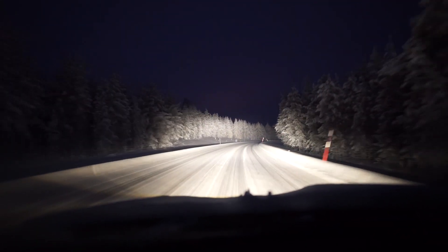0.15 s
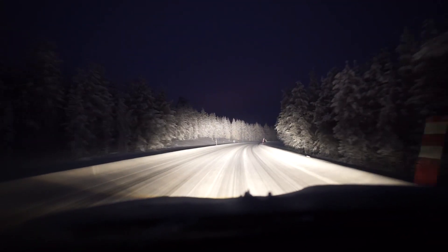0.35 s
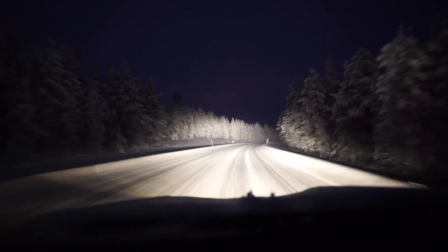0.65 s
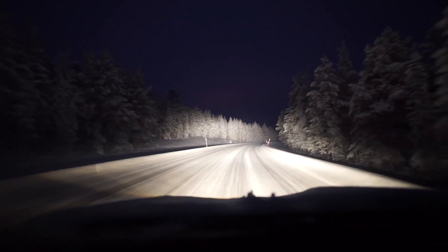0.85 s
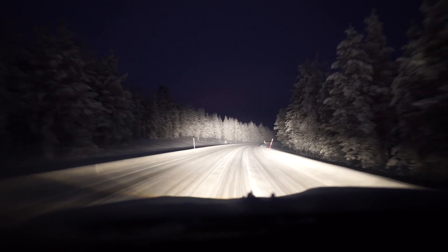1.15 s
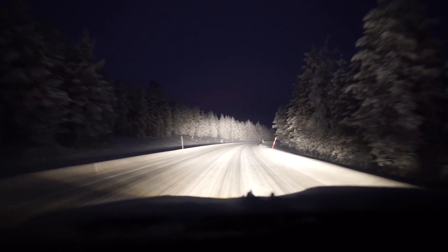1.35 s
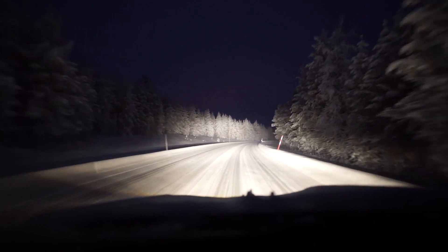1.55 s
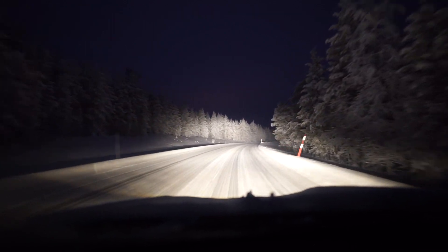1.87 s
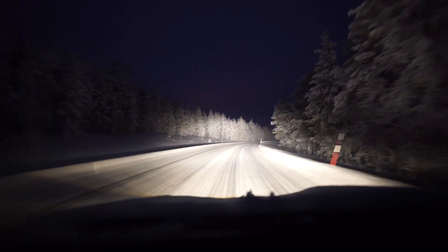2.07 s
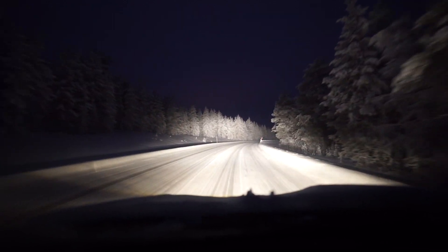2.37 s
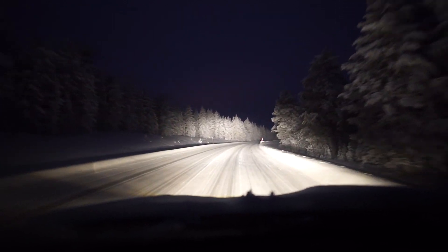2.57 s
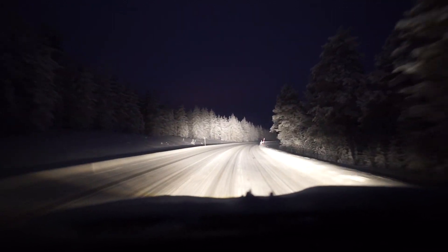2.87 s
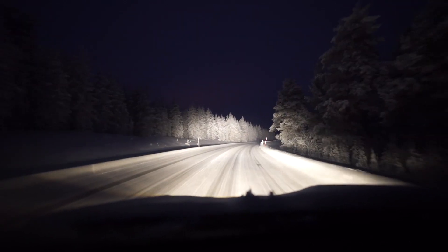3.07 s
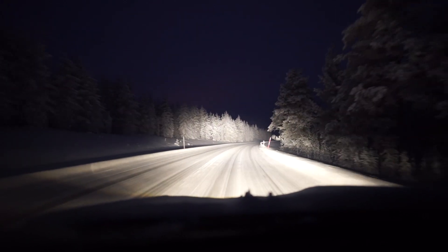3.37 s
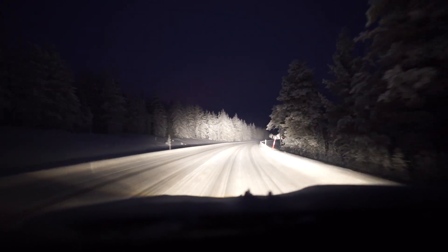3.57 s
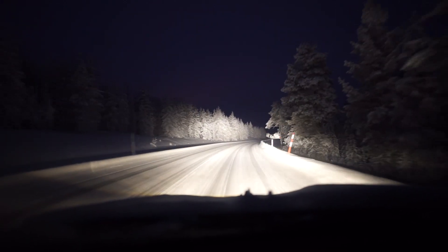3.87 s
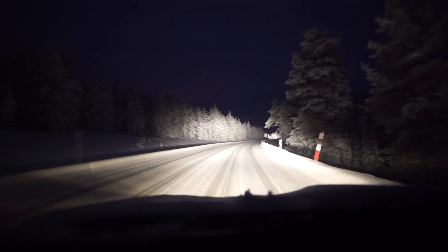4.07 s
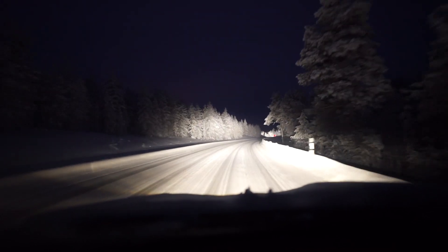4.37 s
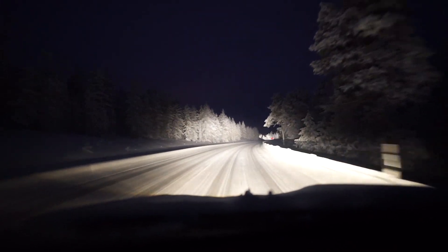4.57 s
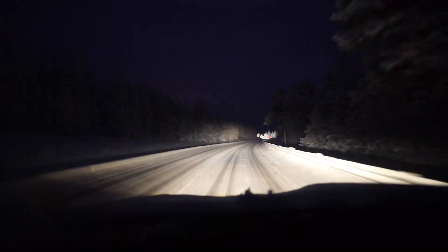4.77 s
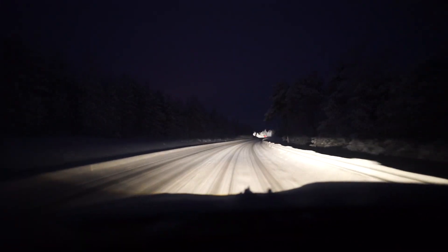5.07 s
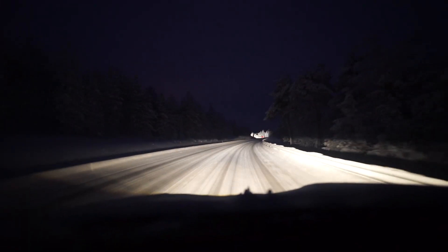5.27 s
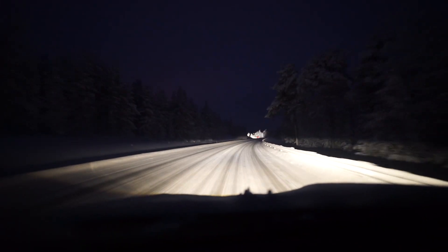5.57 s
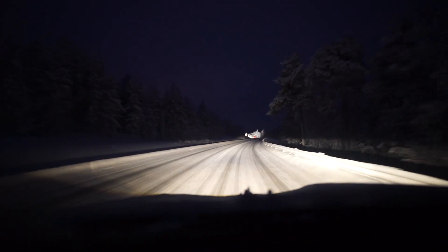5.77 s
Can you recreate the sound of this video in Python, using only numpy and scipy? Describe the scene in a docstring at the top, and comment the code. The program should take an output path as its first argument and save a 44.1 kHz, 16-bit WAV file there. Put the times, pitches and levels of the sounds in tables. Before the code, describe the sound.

Inside an electric car at night, tyres rumble steadily over packed snow, with low cabin boom, hollow crunches and dull thumps.

```python
"""Electric car on packed snow, from the cabin

A low boom rings the cabin's resonances, swelling and easing as the road heaves the body.
Random impacts ring the tyres into drumming and the floor panels into crunch, harder on rutted stretches.
Filtered noise and grit make a faint hiss; sine tones give the inverter whine and, with noise, the tread song.
Ridges thump, crust gives way in runs of hollow cracks, and short bursts of noise tick in the trim.
"""
import sys
import numpy as np
from scipy import signal
from scipy.fft import rfft, irfft, next_fast_len
from scipy.io import wavfile
from scipy.ndimage import uniform_filter1d, minimum_filter1d

SR = 44100
rng = np.random.default_rng(int(sys.argv[2]) if len(sys.argv) > 2 else 0)


def file_out(sig):
    """Save sig as 16-bit WAV at sys.argv[1]."""
    # one column per channel
    cols = np.atleast_2d(sig).T
    # limit, then scale
    lim = np.clip(cols, -1, 1)
    pcm = np.round(lim * 32767).astype(np.int16)
    wavfile.write(sys.argv[1], SR, pcm)


N = 261068
PADDED = next_fast_len(N, True)
T, HZ = np.arange(N) / SR, np.fft.rfftfreq(PADDED, 1 / SR)


def amp(db):
    """Decibels to gain."""
    return 10 ** (np.asarray(db) / 20)


def unit(x):
    """Scales a sound to rms 1."""
    return x / np.sqrt(np.mean(x ** 2) + 1e-20)


def read(points):
    """Reads a table over frequency, joined by straight lines on a log axis."""
    hz, value = np.transpose(points)
    return np.interp(np.log(HZ + 1), np.log(hz + 1), value)


def resonances(modes):
    """Gain over frequency of a few resonances; each width is roughly that at half amplitude."""
    power = 0
    for hz, width_hz, db in modes:
        offset = (HZ - hz) / (0.47 * width_hz)
        power = power + amp(db) ** 2 / (1 + offset ** 2) ** 2
    return np.sqrt(power)


def below(x, hz):
    """The part of a sound under a frequency."""
    size = next_fast_len(N + SR // 10, True)
    lowpass = 1 / (1 + (np.fft.rfftfreq(size, 1 / SR) / hz) ** 6)
    return irfft(rfft(x, size) * lowpass, size)[..., :N]


def wander(rate_hz, size=32768):
    """A slow random curve of about rms 1, moving no faster than about rate_hz."""
    hz = np.fft.rfftfreq(size, N / SR / size)
    slow = irfft(rfft(rng.standard_normal(size)) / (1 + (hz / rate_hz) ** 6))
    return unit(np.interp(T, np.linspace(0, N / SR, size), slow))


def swell(centre_s, half_s):
    """A smooth rise and fall around one moment, down to 1/e at half_s either side."""
    out = np.zeros(N)
    near = slice(*np.searchsorted(T, [centre_s - 4 * half_s, centre_s + 4 * half_s]))
    out[near] = np.exp(-((T[near] - centre_s) / half_s) ** 2)
    return out


def panned(pan_db):
    """Left and right gains, for a left-minus-right difference in dB."""
    return amp([[pan_db / 2], [-pan_db / 2]])


def grains(per_s, spread_db):
    """Two unrelated trains of tiny impacts at random moments, a few of them large."""
    size = amp(spread_db * np.minimum(rng.exponential(1, (2, N)), 4))
    sign = rng.choice([-1, 1], (2, N))
    struck = rng.random((2, N)) < per_s / SR
    return unit(size * sign * struck)


def patchy(x, depth_db, size=14, order=4, count=512):
    """Random swells over time and pitch, so that the strongest pitch keeps shifting."""
    # size: frames of count / 4 samples to smooth over; order: frequency bins to smooth over
    frames = dict(nperseg=count, noverlap=count - count // 4)
    z = signal.stft(x, **frames)[2]
    field = uniform_filter1d(rng.standard_normal(z.shape[1:]), order, 0)
    field = unit(uniform_filter1d(field, size, 1))
    return signal.istft(z * amp(depth_db * field), **frames)[1][:, :N]


def steady(x, size):
    """Evens out swells longer than size samples, so that the layer's level curve sets the loudness."""
    power = uniform_filter1d(uniform_filter1d(x.mean(0) ** 2, size), size)
    return x / np.sqrt(np.abs(power) + 1e-9)


# likeness of the two microphone ports: pitch_hz, likeness (0-1)
PORT_LIKENESS = [(50, .99), (110, .94), (195, .91), (260, .68), (350, .8), (450, .45), (620, .6),
                 (1100, .48), (1550, .55), (2000, .08), (4300, .03), (6200, .3), (14000, .25)]
# balance of the ports: pitch_hz, left_minus_right_db
PORT_BALANCE = [(25, -4), (50, -8), (125, -8.5), (170, -9), (215, 4.5), (250, -6), (370, 6.5), (480, -1),
                (620, 2), (800, 0.5), (1350, -0.5), (2200, 0.3), (15000, -0.5)]
# phase between the ports: pitch_hz, left_lead_rad
PORT_LEAD = [(40, 0.9), (90, -0.71), (125, -0.065), (175, -0.31), (220, -0.17), (275, 0.9), (345, -1.39),
             (420, 1), (550, -0.18), (1500, -0.16)]


def inside(drive, colour, ripple_db=2.5, ripple_s=0.02):
    """Colours two unrelated forces and mixes them as the cabin carries them to the two ports."""
    right, other = rfft(drive, PADDED) * colour
    same = np.clip(read(PORT_LIKENESS), 0, 1)
    left = (same * right + np.sqrt(1 - same ** 2) * other) * np.exp(1j * read(PORT_LEAD))
    lean = amp(read(PORT_BALANCE) / 2)
    # reflections from the glass comb the treble, differently at each port
    echoes = rng.standard_normal((2, N)) * np.exp(-T / ripple_s)
    comb = unit(rfft(echoes, PADDED).real) * np.clip(HZ / 1000 - .5, 0, 1)
    pair = irfft(np.array([left * lean, right / lean]) * amp(ripple_db * comb), PADDED)[:, :N]
    return pair / np.std(pair.mean(0))


# how crusty the road is: time_s, level_db (before the crunch's own gain)
CRUST_LEVELS = [(0, -41.5), (0.25, -43), (0.42, -44.5), (0.72, -49), (1.35, -44.5), (1.62, -43.5),
                (1.9, -43.5), (2.1, -45), (2.3, -44.5), (2.55, -44.5), (2.75, -45.5), (3.7, -46),
                (4.5, -47), (5.2, -45.5), (5.5, -44), (5.8, -48), (5.92, -41)]
USUAL_CRUST_DB = -45.5


def crustiness():
    """The snow under the tyres, in dB over the usual: long crusty stretches and softer ones."""
    return np.interp(T, *np.transpose(CRUST_LEVELS)) - USUAL_CRUST_DB


# rutted stretches: start_s, length_s, drumming_db, crunch_db (before each layer's gain)
RUTTED_STRETCHES = [(0.084, 0.1, -28, -60), (0.244, 0.029, -23.5, -56.5), (0.878, 0.032, -40.5, -37),
                    (1.082, 0.11, -25, -40.5), (1.297, 0.035, -26.5, -34.5), (1.397, 0.036, -25, -48),
                    (1.452, 0.12, -27, -53), (1.911, 0.025, -25, -31.5), (2.236, 0.019, -29.5, -52),
                    (2.312, 0.065, -23, -53), (2.5, 0.1, -23.5, -38), (2.635, 0.15, -32.5, -59.5),
                    (2.88, 0.045, -28.5, -52), (3.02, 0.048, -25, -56), (3.182, 0.03, -27, -35),
                    (3.463, 0.035, -26.5, -51), (3.559, 0.077, -26, -41.5), (3.735, 0.038, -17, -43),
                    (3.83, 0.057, -23, -51.5), (4.088, 0.2, -25, -53), (4.66, 0.072, -30.5, -60),
                    (4.884, 0.035, -28, -46), (5.402, 0.037, -26, -57), (5.493, 0.039, -22, -43),
                    (5.67, 0.061, -26.5, -38.5)]
RUT_EDGE_S = 0.024


def rutting():
    """Forces of drumming and crunch: each rutted stretch fades in, holds and fades out under the wheels."""
    drum, crush = np.zeros((2, N))
    for start_s, length_s, drum_db, crunch_db in RUTTED_STRETCHES:
        from_middle = np.abs(T - start_s - length_s / 2)
        outside = np.maximum(from_middle - length_s / 2 + RUT_EDGE_S / 2, 0)
        contact = np.exp(-(outside / RUT_EDGE_S) ** 2)
        drum += amp(drum_db) * contact
        crush += amp(crunch_db) * contact
    return drum, crush


# slick spots: centre_s, dip_db (each layer takes its own share), half_s
SLICK_SPOTS = [(0.3, -6.5, 0.1), (0.511, -2, 0.022), (0.825, -6, 0.031), (1.228, -7.5, 0.021),
               (1.608, -8.5, 0.017), (1.773, -2.5, 0.013), (2.13, -10, 0.01), (2.218, -3.5, 0.034),
               (2.445, -1, 0.0091), (2.825, -3, 0.015), (3.144, -4.5, 0.02), (3.26, -2.5, 0.039),
               (3.516, -3.5, 0.014), (4.642, -3.5, 0.023), (5.022, -3.5, 0.088), (5.209, -3, 0.053),
               (5.339, -5, 0.03)]


def slickness():
    """Dips in dB where the tyres briefly run quiet."""
    return sum(db * swell(centre_s, half_s) for centre_s, db, half_s in SLICK_SPOTS)


# dips in the road heave the body, crests unload it: centre_s, boom_gain_db
BODY_HEAVES = [(0.147, 6.5), (0.211, -9), (0.262, 2.5), (0.406, 6), (0.62, -4.5), (1.14, 4.5), (1.369, 5),
               (1.58, 5), (1.85, 6), (1.98, -3), (2.36, -3), (2.6, 2), (3.066, 8.5), (3.17, -5.5),
               (3.56, 5.5), (3.641, 1.5), (3.77, -1.5), (4.38, 5), (4.719, 3.5), (5.07, -1), (5.69, -8.5)]
HEAVE_S = 0.037
# resonances of suspension and cabin air: pitch_hz, width_hz, level_db (relative)
CABIN_MODES = [(45, 23, -11.5), (66.5, 9.1, -16), (90.8, 25, -5), (103, 9.4, -8.5), (117.9, 13, -1),
               (133.8, 65, 0.5), (165.8, 15, 2)]


def boom(slick_db, gain_db=-26.0, surge_db=0.5, surge_hz=8, slick_share=0.38, patch_db=3.0,
         sway_db=-35.5, split_hz=68):
    """The road rings the cabin, now one mode and now another, with the heaves; under it the suspension sways."""
    ring = inside(rng.standard_normal((2, N)), resonances(CABIN_MODES))
    ring = patchy(ring, patch_db, size=8, order=2, count=4096)
    sway = below(ring, split_hz)
    heave_db = sum(db * swell(centre_s, HEAVE_S) for centre_s, db in BODY_HEAVES)
    shake_db = surge_db * wander(surge_hz) + slick_share * slick_db + heave_db
    upper = amp(gain_db + shake_db) * steady(ring - sway, size=3400)
    return upper + amp(sway_db) * steady(sway, size=9000)


# resonances of the tyres, first the air cavity's mode split in two by rolling:
# pitch_hz, width_hz, level_db (relative)
TYRE_MODES = [(196.2, 16, 2), (222.6, 13, 1.6), (231, 140, -10), (287, 31, -10.5), (318.6, 36, -6),
              (346.9, 28, -4.5), (393.6, 42, -7.5), (451, 110, -22)]


def drumming(slick_db, ruts, gain_db=-32.5, ruts_db=-0.53, slick_share=1.0, lumps_per_s=900,
             flutter_db=1.07, patch_db=3):
    """Lumps of packed snow beat the tyres, ringing now one mode and now another, harder on the ruts."""
    beat = inside(grains(lumps_per_s, 3.4), resonances(TYRE_MODES))
    beat = steady(patchy(beat, patch_db, size=6, order=3, count=2048), size=1800)
    force = np.hypot(amp(gain_db + slick_share * slick_db), amp(ruts_db) * ruts)
    return force * beat * amp(flutter_db * wander(23))


# resonances of tread and panels: pitch_hz, width_hz, level_db (relative)
PANEL_MODES = [(492, 76, -2), (584, 83, -7), (640, 310, -11), (800, 11, -12), (897.5, 43, -12),
               (1025, 54, -21), (1150, 230, -20)]
# broad colour of breaking crust: pitch_hz, level_db (relative)
CRUNCH_SPECTRUM = [(260, -27.5), (430, 1.5), (603, -7), (707, -13), (902, -14.5), (1310, -26),
                   (1490, -16.5), (1680, -25.5), (2080, -35.5), (3520, -120)]


def crunch(crust_db, ruts, judder, gain_db=-0.44, ruts_db=-3, broad_db=-10, crystals_per_s=3500,
           judder_db=0.5, patch_db=1.0, fine_db=-43, follow=0.56, split_hz=900):
    """Snow crust breaks under the tread in clumps and rings the floor panels."""
    colour = resonances(PANEL_MODES) + amp(broad_db + read(CRUNCH_SPECTRUM))
    crust = steady(patchy(inside(grains(crystals_per_s, 2.5), colour), patch_db), size=2000)
    coarse = below(crust, split_hz)
    force = np.hypot(amp(USUAL_CRUST_DB + crust_db), amp(ruts_db) * ruts)
    # the fine top follows the road less than the coarse body
    fine = (crust - coarse) * amp(fine_db + follow * crust_db)
    return amp(gain_db + judder_db * judder) * (force * coarse + fine)


# colour of the hiss through the glass: pitch_hz, level_db (relative)
HISS_SPECTRUM = [(1000, -29), (1700, -2), (2000, -5), (2420, -4), (2800, -3.5), (3250, -8.5), (3650, -10.5),
                 (4050, -16), (5060, -16), (5500, -19), (6140, -14.5), (7190, -20.5), (8000, -22.5),
                 (9930, -25.5), (13200, -29), (15500, -30.5)]


def spray(crust_db, slick_db, judder, gain_db=-65.0, follow=0.88, most_db=4, slick_share=0.81,
          burst_db=1.4, gritty_hz=1000, air_db=-2, grit_db=-4, grit_per_s=3000, judder_db=0.5, patch_db=1.7):
    """Rush of air plus fine grit, muffled by the glass; crust throws more, and each bright scrunch a burst."""
    air = amp(air_db) * rng.standard_normal((2, N))
    grit = amp(grit_db) * grains(grit_per_s, 3.6)
    drive = patchy(air + grit, patch_db, size=9, order=7)
    # low-pitched scrunches throw little
    bursts = sum(min(hz / gritty_hz, 1) ** 2 * swell(centre_s, half_s)
                 for centre_s, _, hz, half_s in CRUST_PATCHES)
    thrown_db = follow * np.minimum(crust_db, most_db) + slick_share * slick_db
    thrown_db = thrown_db + burst_db * bursts + judder_db * judder
    return inside(drive, amp(read(HISS_SPECTRUM))) * amp(gain_db + thrown_db)


# thin tones of the drive electronics: pitch_hz, level_db (rms, before panning)
SWITCHING_TONES = [(6917, -99), (7293, -90.5), (8053, -101)]


def inverter(drift_hz=3, pan_db=-3):
    """The motor's switching tones: thin sines whose pitches drift a little together."""
    drift = drift_hz * wander(4)
    tones = sum(amp(db) * unit(np.sin(2 * np.pi * np.cumsum(hz + drift) / SR)) for hz, db in SWITCHING_TONES)
    return tones * panned(pan_db)


# patches of crust that scrunch under a tyre: centre_s, level_db (before the layer's gain), pitch_hz, half_s
CRUST_PATCHES = [(0.023, -33, 509, 0.057), (0.042, -53, 1252, 0.04), (0.21, -43.5, 618, 0.027),
                 (0.245, -37.5, 498, 0.03), (0.352, -41.5, 560, 0.014), (0.566, -42, 1050, 0.021),
                 (0.614, -39.5, 556, 0.017), (1.019, -47, 970, 0.017), (1.106, -37.5, 444, 0.022),
                 (1.139, -42, 900, 0.011), (1.201, -36.5, 822, 0.0057), (1.32, -48, 555, 0.0088),
                 (1.371, -39.5, 955, 0.026), (1.376, -35, 562, 0.0083), (1.466, -43.5, 1040, 0.014),
                 (1.472, -42, 560, 0.011), (1.526, -46.5, 1018, 0.046), (1.722, -41, 900, 0.0068),
                 (1.817, -34.5, 594, 0.022), (1.819, -43, 990, 0.019), (1.902, -39, 859, 0.043),
                 (2, -39.5, 554, 0.0089), (2.132, -42, 890, 0.014), (2.228, -40.5, 498, 0.018),
                 (2.325, -32, 382.5, 0.038), (2.497, -44, 827, 0.011), (2.55, -26, 348.6, 0.016),
                 (2.564, -44, 560, .055), (3.746, -27, 385, 0.014), (3.782, -41.5, 591, 0.055),
                 (4.728, -49.5, 1074, 0.027), (4.898, -45.5, 614, 0.038), (5.083, -45, 1020, 0.0083),
                 (5.311, -39, 624, 0.015), (5.407, -42, 958, 0.013), (5.54, -48, 1043, 0.0088),
                 (5.561, -36, 664, 0.005), (5.878, -49, 1130, 0.034)]
CRACK_S = 0.0013  # time for one crack to reach its peak


def scrunches(gain_db=-2, cracks_per_s=1200, own_db=-5, roar_db=-7, roar_hz=440):
    """Crust gives way in a run of hollow cracks around one pitch; the same cracks make the wheel arch roar."""
    age = T[:2048] / CRACK_S
    crack = (age * np.exp(-age))[None]
    runs = [signal.oaconvolve(grains(cracks_per_s, 1.3), crack, axes=1)[:, :N] for _ in range(3)]
    common, left, right = (unit(a) + 1j * unit(b) for a, b in runs)
    rattle = common + amp(own_db) * np.array([left, right])
    power = uniform_filter1d(np.abs(rattle.mean(0)) ** 2, size=1100)
    rattle = rattle / np.sqrt(np.abs(power) / 2 + 1e-9)
    out = np.zeros((2, N))
    for centre_s, db, hz, half_s in CRUST_PATCHES:
        shape = swell(centre_s, half_s)
        near = shape > 0
        # the complex rattle modulates two carriers: the patch's pitch and the roar
        pitch = np.exp(2j * np.pi * hz * T[near])
        roar = np.exp(2j * np.pi * (roar_hz * T[near] + rng.random()))
        ring = pitch + amp(roar_db) * roar
        out[:, near] += amp(gain_db + db) * shape[near] * (rattle[:, near] * ring).real
    return out


# ridges of snow that thump a wheel: start_s, level_db (relative)
SNOW_RIDGES = [(0.146, -10), (0.211, -18.5), (0.534, -19.5), (0.702, -25.5), (1.106, -28), (1.323, -15),
               (1.373, -18.5), (1.402, -23.5), (1.524, -19), (1.804, -24), (1.846, -15), (1.994, -17.5),
               (2.073, -17.5), (2.16, -22), (2.239, -18.5), (2.459, -16.5), (2.536, -14), (2.911, -22.5),
               (3.185, -26), (3.721, -20), (4.206, -21.5), (4.888, -16), (5.128, -19)]


def thumps(gain_db=-11.0, decay_s=0.0095, knock_db=-11, dull_hz=900):
    """A ridge gives one wheel a short, dull push that dies in tyre and panels."""
    push = np.zeros(N)
    for start_s, db in SNOW_RIDGES:
        age = np.maximum(T - start_s, 0) / decay_s
        push += amp(db) * 2 * np.sqrt(age) * np.exp(-age)
    colour = resonances(TYRE_MODES) + amp(knock_db) * resonances(PANEL_MODES)
    thud = below(inside(rng.standard_normal((2, N)), colour), dull_hz)
    return amp(gain_db) * push * steady(thud, size=500)


# ticks, scrapes and squeaks of the trim:
# start_s, level_db, pitch_hz, width_hz, rise_s, decay_s, left_minus_right_db
TRIM_TICKS = [(0.491, -65, 14300, 3200, 0.0011, 0.013, 17), (0.555, -73.5, 7500, 7000, .02, .045, -6.5),
              (0.598, -66, 5330, 900, 0.0037, 0.01, -5), (1.944, -63, 13000, 2400, .003, .013, -2),
              (2.868, -66.5, 3570, 128, 0.016, .028, -9.5), (4.589, -61.5, 12900, 4200, 0.0025, 0.0082, 4),
              (4.929, -61, 13500, 4100, 0.0079, 0.012, 8)]


def trim(size=16):
    """Plastic trim slips a little: a thin tick or squeak of narrow noise, rising and dying quickly."""
    out = np.zeros((2, N))
    for start_s, db, hz, width_hz, rise_s, decay_s, pan_db in TRIM_TICKS:
        colour = resonances([(hz, width_hz, 0)])[::size]  # fewer bins make a shorter noise
        fizz = unit(irfft(colour * np.exp(2j * np.pi * rng.random((2, len(colour))))))
        age, first = T[:fizz.shape[1]], round(start_s * SR)
        shape = np.clip(age / rise_s, 0, 1) * np.exp(-np.maximum(age - rise_s, 0) / decay_s)
        out[:, first:first + len(age)] += amp(db) * shape * fizz * panned(pan_db)
    return out


# the tread sings on hard snow: centre_s, level_db (before the tone and fuzz gains), half_s
TREAD_SONGS = [(1.165, -56, 0.039), (1.353, -58, 0.076), (1.555, -63.5, 0.52), (1.646, -48.5, 0.022),
               (1.844, -52.5, 0.026), (5.718, -56.5, 0.045)]


def singing(hz=1490, waver_hz=22, width_hz=120, fuzz_db=-6, tone_db=-3.0, flutter_db=5.5, pan_db=-6,
            rest_db=-78):
    """The tread of a right-hand tyre gives a wavering, fuzzy note, very faint between its swells."""
    phase = 2 * np.pi * np.cumsum(hz + waver_hz * wander(25)) / SR
    tone = unit(np.sin(phase) * amp(flutter_db * wander(30)))
    fuzz = inside(rng.standard_normal((2, N)), resonances([(hz, width_hz, 0)]))
    loud = amp(rest_db) + sum(amp(db) * swell(centre_s, half_s) for centre_s, db, half_s in TREAD_SONGS)
    return loud * (amp(tone_db) * tone + amp(fuzz_db) * fuzz) * panned(pan_db)


def scene():
    """All that the car sends into the cabin; crunch and spray share one road and one judder of the wheels."""
    crust_db, slick_db, judder = crustiness(), slickness(), wander(21)
    drum, crush = rutting()
    tyres = drumming(slick_db, drum) + thumps() + singing()
    snow = crunch(crust_db + slick_db, crush, judder) + spray(crust_db, slick_db, judder) + scrunches()
    return boom(slick_db) + tyres + snow + inverter() + trim()


def limited(x, ceiling_db, size=400):
    """A limiter smoothly turns down the highest peaks."""
    over = np.maximum(np.abs(x).max(0) / amp(ceiling_db), 1)
    gain = minimum_filter1d(1 / over, 2 * size)
    return x * uniform_filter1d(uniform_filter1d(gain, size), size)


def record(dry, low_cut_hz=27, ceiling_db=-10.0, edge_hz=15700):
    """The microphone sheds the deepest bass; a limiter, soft ends, then the band limit."""
    ends = np.sin(np.pi / 2 * np.clip(np.minimum(T, T[-1] - T) / .003, 0, 1)) ** 2
    thinned = limited(dry - below(dry, low_cut_hz), ceiling_db) * ends
    lowpass = signal.firwin(511, edge_hz, window=("kaiser", 9), fs=SR)
    return signal.oaconvolve(thinned, lowpass[None], "same")


dry = scene()
out = record(dry)
file_out(out)
```